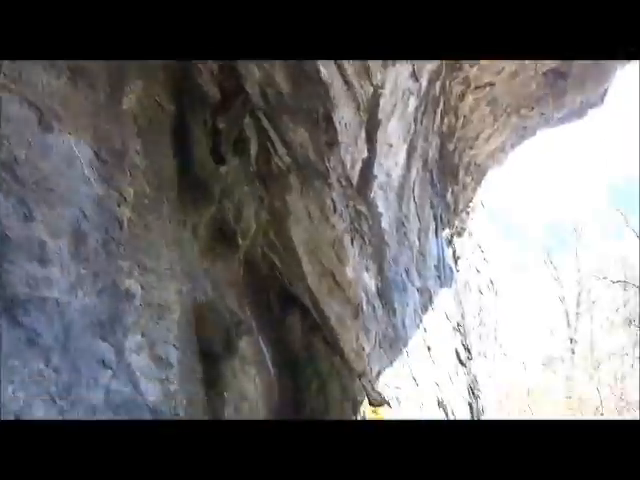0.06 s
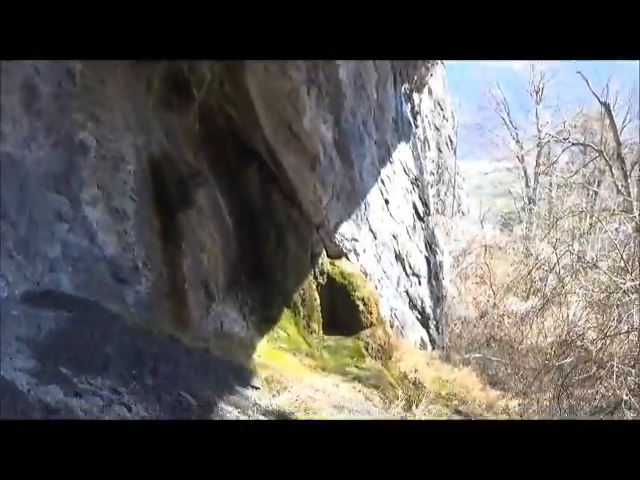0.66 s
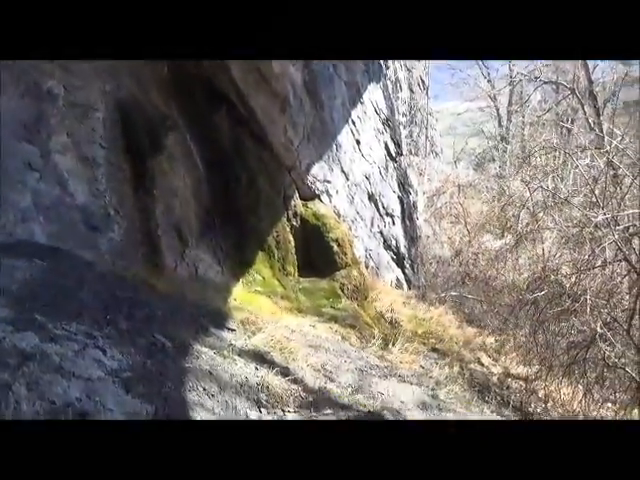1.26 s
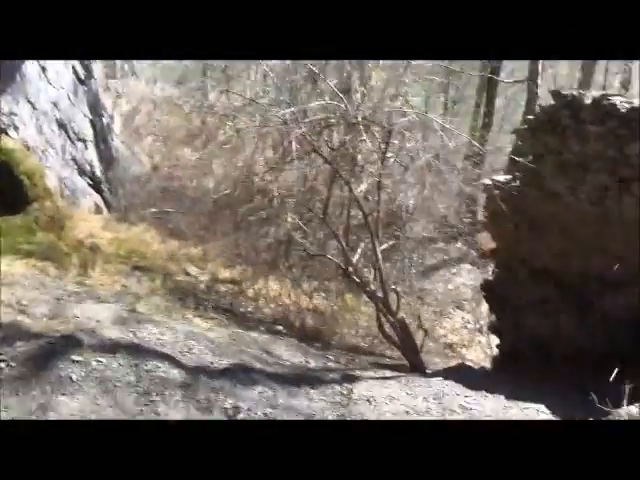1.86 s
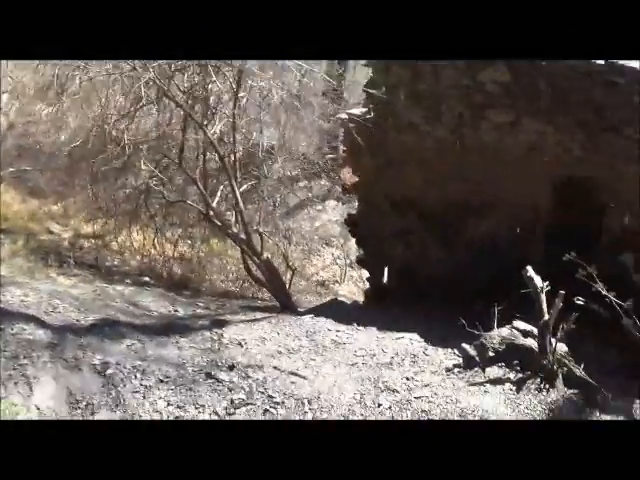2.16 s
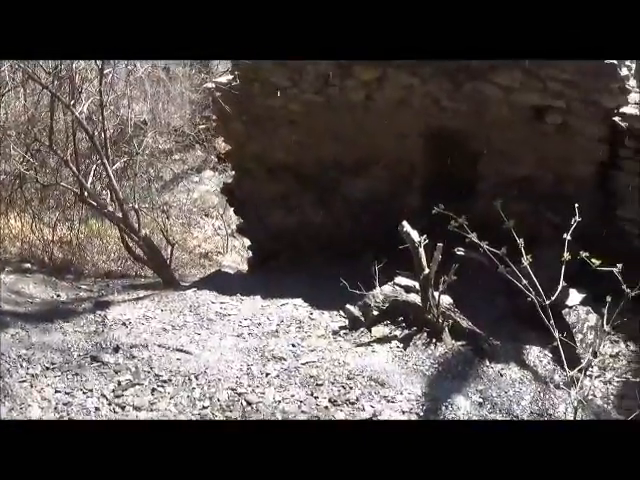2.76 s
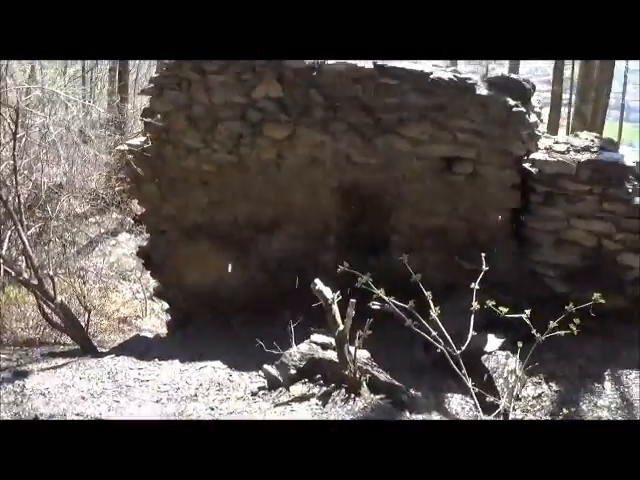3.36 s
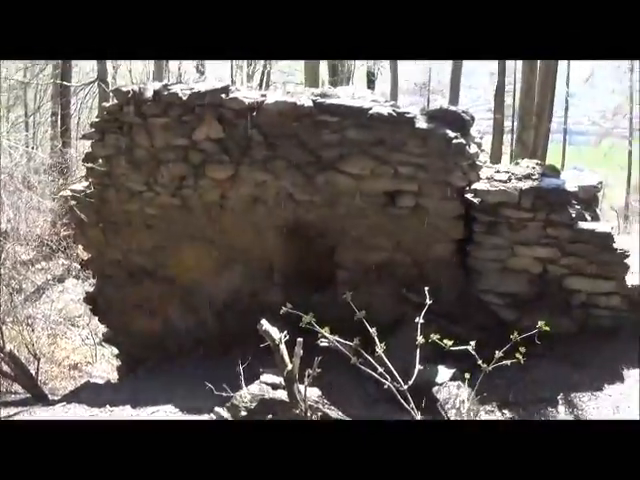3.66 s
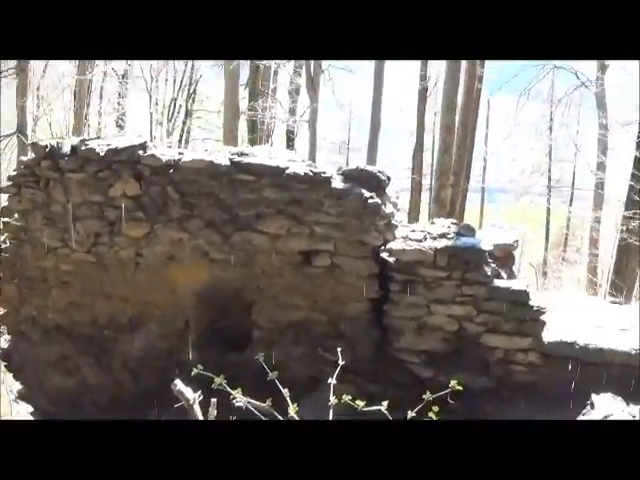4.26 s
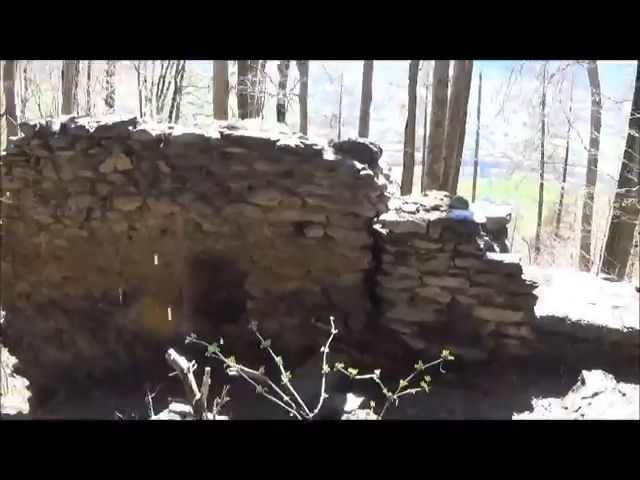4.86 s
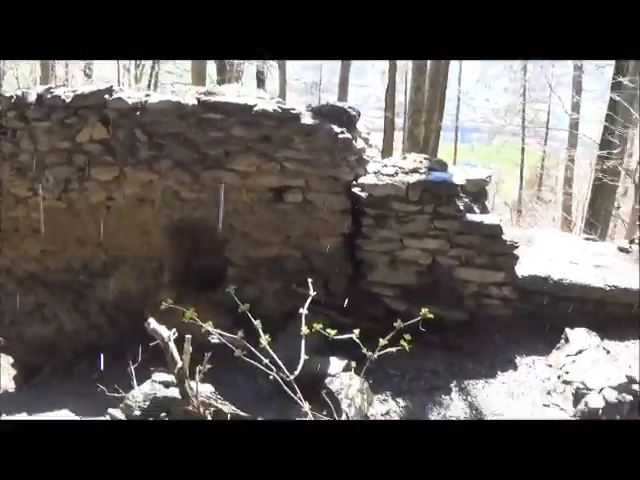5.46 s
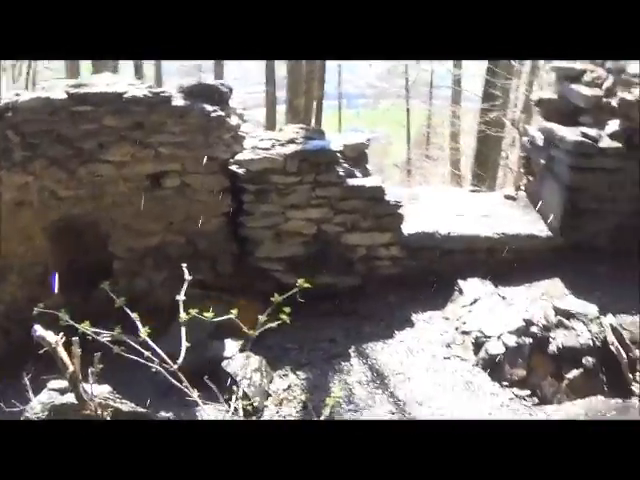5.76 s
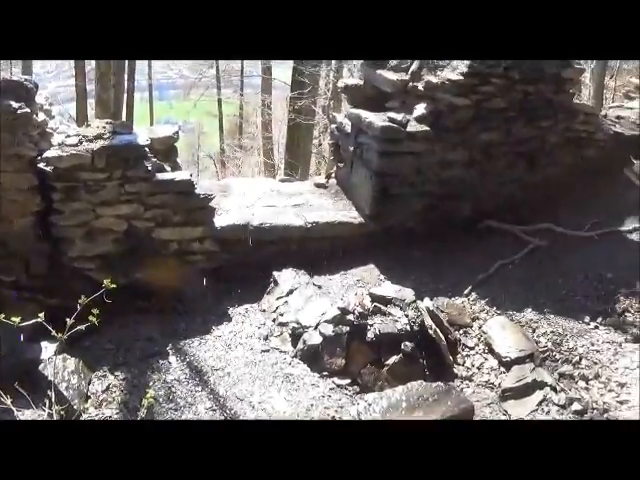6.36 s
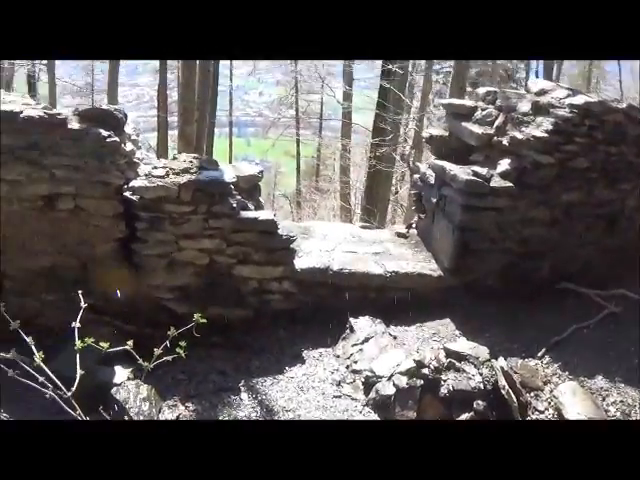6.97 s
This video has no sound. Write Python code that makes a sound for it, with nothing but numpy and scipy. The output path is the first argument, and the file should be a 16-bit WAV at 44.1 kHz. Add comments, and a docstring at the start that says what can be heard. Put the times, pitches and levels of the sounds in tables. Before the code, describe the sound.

Outdoors beneath overhanging rock, many quick drops tick and splash on stones near the microphone, with a light patter behind them and now and then a small ringing bubble in a puddle. The dripping never stops. A few stones knock underfoot in the middle, around one dull, soft step, and a brief gravel scuff comes near the end. Underneath lie a soft distant valley rush and a very faint motor hum.

```python
"""Under a rock overhang above a valley, water drips onto stony ground. Close drops burst in sharp splats,
farther ones blur into a fine patter, and now and then a bubble trapped in a puddle rings.
A shoe thuds softly on the ground and a few stones clack and crunch under it.
The valley rushes far below, over a faint rumble and the hum of a camera's motor."""
import sys
import numpy as np
from scipy import signal
from scipy.fft import rfft, irfft, next_fast_len
from scipy.io import wavfile
from scipy.ndimage import map_coordinates

SR = 44100
rng = np.random.default_rng(int(sys.argv[2]) if len(sys.argv) > 2 else 0)


def to_wav(sig):
    """Store sig (one row per channel, or 1-D mono) as 16-bit WAV at the path in sys.argv[1].

    Samples outside -1..1 are clipped; the rate is SR.
    """
    pcm = np.clip(np.atleast_2d(sig), -1, 1) * 32767
    pcm = np.round(pcm).astype(np.int16)
    wavfile.write(sys.argv[1], SR, pcm.T)  # frames by channels


N = 310023

TOP_HZ = 11150  # the treble ends here
# How alike far sounds are in both ears. Each row: frequency in Hz, likeness from 0 to 1 (the same).
EAR_LIKENESS = [(60, 1), (270, 0.98), (570, 0.89), (1200, 0.76), (3000, 0.56), (9000, 0.82)]
# How hard it drips. Each row: time in seconds, relative levels in dB of the patter and of the fine spray.
DRIP_FLOW = [(0, -44, -37.5), (.45, -45, -37.5), (.85, -45.5, -36.5), (1.25, -45.5, -39.5),
             (1.7, -45, -39.5), (2.1, -44, -38.5), (2.75, -45, -37), (3.1, -45.5, -37.5),
             (3.45, -47, -39.5), (3.65, -45, -36.5), (3.9, -46, -40.5), (4.35, -44.5, -37.5),
             (4.85, -44.5, -36), (5.2, -46, -39), (5.42, -44, -36.5), (6.15, -46, -36.5),
             (6.45, -44, -38.5), (7.03, -45.5, -37)]
# The camera turns, so the drops drift from right to left.
# Each row: time in seconds, left minus right level in dB, boost of the lesser drops in dB.
CAMERA_TURN = [(0, -2.5, -4.5), (1.5, -2, 1.5), (2.3, -1, -1.5), (4, 1.2, 3.5), (5, 1, -3.5),
               (7.03, 3.5, 2)]


def amp(db):
    """Turn decibels into a number to multiply a sound by."""
    return 10 ** (np.asarray(db) / 20)


def unit(x):
    """Scale a sound so that its average level (rms) is 1."""
    return x / np.sqrt(np.mean(x ** 2) + 1e-20)


def along(points, hz):
    """Read between (Hz, value) points, giving every octave equal room."""
    point_hz, values = np.transpose(points)
    return np.interp(np.log(hz + 1), np.log(point_hz), values)


def curves(rows):
    """Turn each column after the time into a curve with one value per sample."""
    times, *columns = np.transpose(rows)
    return [np.interp(np.arange(N) / SR, times, column) for column in columns]


def wobble(rate):
    """A smooth curve through rate random values a second."""
    return map_coordinates(rng.standard_normal(int(N * rate / SR) + 4), [np.arange(N) * rate / SR])


def filtered(x, response):
    """Turn each frequency of x up or down by response(hz)."""
    size = next_fast_len(N + SR // 4)
    return irfft(rfft(x, size) * response(np.fft.rfftfreq(size, 1 / SR)), size)[..., :N]


def noise(spectrum):
    """Far-off stereo noise of level 1, its tone shaped by (Hz, dB) points."""
    def colour(hz):
        width = np.arccos(np.clip(along(EAR_LIKENESS, hz), -1, 1)) / 2
        return amp(along(spectrum, hz)) * [np.cos(width), np.sin(width)]
    mid, side = filtered(rng.standard_normal((2, N)), colour)
    return unit(np.array([mid + side, mid - side]))


def place(times, sounds):
    """Add up short sounds, shaped (events, 2 ears, samples), at their times in seconds."""
    at = np.maximum(np.round(times * SR).astype(int)[:, None] + np.arange(sounds.shape[-1]), 0)
    return np.array([np.bincount(at.ravel(), sounds[:, ear].ravel(), N)[:N] for ear in range(2)])


def rumble():
    """A faint deep rumble comes and goes."""
    # Each row: time in seconds, level in dB.
    levels = [(0, -56), (1.2, -75), (1.6, -79), (5.2, -61), (6.2, -56.5), (6.7, -56), (7.03, -69)]
    level_db, = curves(levels)
    return amp(level_db) * noise([(30, -40), (46, -29), (55, -2), (70, -20), (120, -12), (400, -120)])


def motor():
    """The camera's motor hums at 1 to 4 times its turning rate, which drifts a little."""
    # The first and third tones. Each row: pitch in Hz, average level in dB.
    odd_tones = [(69.8, -80), (209.5, -64)]
    # The even tones swell and fade. Each row: time in seconds, second tone in dB, fourth tone in dB.
    even_levels = [(0, -58, -76), (.9, -57.5, -75), (1.35, -56, -57), (2.05, -67, -56.5), (2.6, -66, -64),
                   (3.2, -55, -58), (4.1, -70, -63), (4.7, -65, -66), (5.8, -66, -68), (7.03, -62, -76)]
    drifting_time = np.cumsum(1 + 0.003 * wobble(3)) / SR
    shaft_hz = odd_tones[0][0]
    second_db, fourth_db = curves(even_levels)
    tones = odd_tones + [(2 * shaft_hz, second_db), (4 * shaft_hz, fourth_db)]
    return sum(np.sqrt(2) * amp(db + wobble(6.6)) * np.sin(2 * np.pi * hz * drifting_time)
               for hz, db in tones)


def valley():
    """Far below, a deep roar and a higher rush each swell at their own pace."""
    # Each row: time in seconds, relative levels in dB of the roar and of the rush.
    levels = [(0, -47.5, -45.5), (.45, -48, -48.5), (1, -48, -47.5), (1.5, -46.5, -47), (2.3, -47.5, -49.5),
              (2.7, -47, -47.5), (3.4, -48, -48.5), (4.1, -48.5, -48), (4.8, -47, -49), (5.55, -47.5, -47),
              (6.05, -49, -49), (7.03, -47.5, -47)]
    # The tone of each. Each row: frequency in Hz, relative level in dB.
    roar_spectrum = [(20, -23), (35, -10), (55, -2.5), (120, 1), (330, -0.5), (480, -3), (800, -4.5),
                     (2000, -66)]
    rush_spectrum = [(200, -24), (480, -9), (780, -1.5), (980, -1.5), (1300, -10), (2000, -20),
                     (5000, -15.5), (11000, -15)]
    roar_db, rush_db = curves(levels)
    roar = amp(roar_db + 1.2 + 0.56 * wobble(14)) * noise(roar_spectrum)
    rush = amp(rush_db + 4.0 + 0.7 * wobble(4)) * noise(rush_spectrum)
    return roar + rush


def valley_swells():
    """Now and then one range of pitches in the valley's rush rises and sinks back."""
    # Each row: peak time and spread in seconds, level in dB, pitch in Hz, width in octaves.
    swells = [(0.12, .15, -50.5, 392, 0.15), (1.7, .3, -58, 260, 0.66), (3.95, 0.36, -50, 245, 0.43),
              (4.9, 0.34, -51, 830, 0.18)]
    t = np.arange(N) / SR
    grid_hz = np.geomspace(40, 4000, num=60)
    total = np.zeros((2, N))
    for peak, spread, db, hz, octaves in swells:
        band_db = -10 * np.log10(np.e) * (np.log2(grid_hz / hz) / octaves) ** 2 / 2
        rise_and_fall = np.exp(-((t - peak) / spread) ** 2 / 2)
        total += amp(db) * rise_and_fall * noise(np.column_stack([grid_hz, band_db]))
    return total


def ticking(rate, decay_ms, spread_db):
    """A loudness curve of random ticks, rate a second: each starts at once and dies away."""
    hits = rng.random(N) < rate / SR
    energy = amp(spread_db * np.clip(rng.standard_normal(N), -2, 2)) ** 2
    kept_per_sample = np.exp(-1000 / (decay_ms * SR))
    return unit(np.sqrt(signal.lfilter([1], [1, -kept_per_sample], hits * energy)))


def far_drops():
    """Farther off, the patter and its fine spray merge into a restless, crackling hiss."""
    # The tone of each. Each row: frequency in Hz, relative level in dB.
    patter_spectrum = [(500, -18), (1300, -2.5), (2200, -1), (3100, 0.5), (5500, -1.5), (8000, -3),
                       (11000, -20.5)]
    spray_spectrum = [(2000, -22), (5000, -38), (7000, -4), (8800, 2), (10000, 2.5), (11200, -12.5)]
    patter_db, spray_db = curves(DRIP_FLOW)
    flurry_db = 0.9 * wobble(70)
    ticks = ticking(rate=520, decay_ms=0.99, spread_db=6.0)
    patter = amp(patter_db - 0.86 + flurry_db) * np.hypot(ticks, 0.9) * noise(patter_spectrum)
    spray = amp(spray_db - 6.5 + flurry_db) * np.hypot(ticks, 0.55) * noise(spray_spectrum)
    return patter + spray


def overhang_echo(x, fade_s):
    """The rock throws back a short, blurred echo that falls by 60 dB in fade_s seconds."""
    t = np.arange(SR // 2) / SR
    tail = rng.standard_normal((2, len(t))) * amp(-60 * t / fade_s) * (1 - np.exp(-t / 0.017))
    return signal.fftconvolve(x, tail / np.linalg.norm(tail[0]), axes=1)[:, :N]


def footstep(rise_s=0.0029):
    """A shoe settles on soft ground with a dull thud, heel then sole."""
    # Each row: start in seconds, level in dB, frequency in Hz above which the thud fades.
    heel_and_sole = [(3.374, -35.5, 330), (3.404, -40, 600)]
    t = np.arange(N) / SR
    thud = np.zeros(N)
    for start, db, hz in heel_and_sole:
        age = np.maximum(t - start, 0) / rise_s
        dull_noise = unit(filtered(rng.standard_normal(N), lambda f: (f > 85) / (1 + (f / hz) ** 4)))
        thud += amp(db) * age * np.exp(1 - age) * dull_noise
    return thud


def impacts(rows, snap, stereo_width, broad_share=0, size=768):
    """A drop or stone hits: a sharp click (as strong as snap) and a noise that dies in milliseconds."""
    # Each row: time in seconds, level in dB (as if the hit lasted 1 ms), pitch in Hz,
    # width in octaves, length in ms, left minus right level in dB.
    start, db, hz, octaves, ms, pan = np.transpose(rows)[:, :, None, None]
    lead, per_ms = size // 12, SR / 1000  # both in samples
    t_ms = (np.arange(size) - lead) / per_ms
    ms = np.maximum(ms, 0.2)
    rise_ms, decay_ms = 0.75 * ms, 3.23 * ms
    envelope = np.exp(-np.abs(t_ms) / np.where(t_ms < 0, rise_ms, decay_ms))
    hiss = rng.standard_normal((len(rows), 3, size))  # shared, left, right
    burst = (hiss[:, :1] + stereo_width * hiss[:, 1:]) * envelope / np.sqrt(ms * per_ms)
    click = (np.arange(size) == lead + size // 128) * snap / ms  # shorter hits click more
    freqs = np.fft.rfftfreq(size, 1 / SR) + 1
    bell = lambda width: np.exp(-(np.log2(freqs / hz) / (2 * width)) ** 2)
    band = (bell(np.maximum(octaves, 0.1)) + broad_share * bell(1.0)) * (freqs < TOP_HZ)
    lag_s = pan * 2.5e-6  # the nearer ear hears it first
    ears = np.array([[1], [-1]])
    wave = irfft(rfft(burst + click) * band * np.exp(1j * np.pi * freqs * lag_s * ears), size)
    wave /= np.sqrt(np.sum(wave.mean(1, keepdims=True) ** 2, 2, keepdims=True) / per_ms)
    return place(start.ravel() - lead / SR, wave * amp(db + ears * pan / 2))


def stones(grains_per_scuff=30):
    """Loose stones clack together under the shoe, and grit crunches in short clouds of grains."""
    # Each row: time in seconds, level in dB, pitch in Hz, width in octaves, length in ms.
    knocks = [(2.476, -24, 1040, 0.64, 0.78), (2.476, -33, 2150, 0.083, 0.54),
              (2.8068, -26.5, 1920, 0.24, 0.63), (2.8069, -31, 5500, .6, .4),
              (4.1645, -37, 1150, 0.35, 4.2), (4.1646, -35, 4600, .6, .9), (4.1743, -27, 7000, 0.71, 1.3),
              (4.1745, -30, 1050, 0.39, 3), (4.3145, -35, 1150, 0.18, 2), (4.3730, -31.5, 950, 0.24, 2.8)]
    # Each row: middle time in seconds, level of a grain in dB, spread in seconds, pitch in Hz.
    scuffs = [(1.004, -40, 0.0067, 3000), (4.171, -39.5, 0.005, 2100), (6.328, -37.5, 0.02, 3800)]
    clacks = impacts(np.column_stack([knocks, np.zeros(len(knocks))]), snap=1.0, stereo_width=0.18)
    middle, db, spread, hz = np.repeat(scuffs, grains_per_scuff, axis=0).T
    when, size, pitch, pan = rng.standard_normal((len(middle), 4)).T
    octaves, ms = np.full(len(middle), 0.6), np.full(len(middle), 1.8)
    grains = [middle + spread * when, db + 0.57 * size, hz * 2 ** (0.5 * pitch), octaves, ms, pan]
    return clacks + impacts(np.column_stack(grains), snap=0.26, stereo_width=1.0)


def drip_times(count):
    """Uneven moments without long gaps: one falls somewhere in each equal slot of time."""
    return (np.arange(count) + rng.random(count)) / count * N / SR


def faint_bubbles(count=36, middle_hz=4200, middle_db=-40, db_per_octave=6.5):
    """Rows for the faint bubbles that drops trap by chance; the small, high ones peak louder."""
    start = drip_times(count)
    octave = rng.uniform(-1.12, 1, count)
    return np.column_stack([start, middle_db + db_per_octave * octave, middle_hz * 2 ** octave])


def bubbles(ring_cycles=28, size=2048):
    """A trapped bubble rings briefly; its pitch wavers and climbs as it nears the surface."""
    # Each row: start in seconds, relative level in dB, starting pitch in Hz.
    clear_bubbles = [(.349, -39.5, 1930), (.3495, -37, 3450), (.367, -43, 3150), (.5265, -42, 1730),
                     (.806, -42, 1590), (.9339, -42, 2180), (.974, -36, 3570), (.9742, -30, 4800),
                     (1.078, -27, 8600), (1.22, -38, 4400), (1.3, -43, 2730), (1.54, -25, 8660),
                     (1.9499, -32.5, 4200), (2.0075, -38, 3200), (2.1859, -36, 2900), (2.3626, -27, 8540),
                     (2.39, -42, 2960), (2.4975, -45, 3000), (2.5035, -30, 8100), (2.5665, -41, 3850),
                     (2.5854, -20.5, 9300), (2.7353, -31, 4140), (2.856, -43, 1530), (2.898, -41, 3500),
                     (2.9825, -34, 6200), (3.192, -45, 6490), (3.282, -29, 9600), (3.405, -35, 5170),
                     (3.412, -38, 3160), (3.5705, -39.5, 2660), (3.7245, -37.5, 2970), (4.082, -36, 3790),
                     (4.099, -29, 8300), (4.1746, -30.5, 4040), (4.2544, -35.5, 2900), (4.612, -44, 2020),
                     (4.7888, -35, 2930), (4.8725, -38, 3280), (4.963, -42, 2000), (5.0424, -38, 2690),
                     (5.056, -37, 3660), (5.272, -40, 3500), (5.3716, -28.5, 6000), (5.5915, -36.5, 3450),
                     (5.7065, -39, 2710), (6.041, -36, 6140), (6.569, -36, 4500), (6.7044, -27, 9400),
                     (6.796, -39, 3350)]
    start, db, hz = np.vstack([clear_bubbles, faint_bubbles()]).T[:, :, None, None]
    cycles = hz * np.arange(size) / SR
    waver = np.cumsum(rng.standard_normal((len(start), 1, size)), axis=2) * np.sqrt(hz / SR)
    ear_offset = 0.48 * rng.standard_normal((len(start), 2, 1))
    phase = 2 * np.pi * cycles * (1 + 0.00028 * cycles) + 0.49 * waver + ear_offset
    envelope = amp(-60 * cycles / ring_cycles) * (1 - np.exp(-cycles))
    return place(start.ravel(), amp(db + 13.5) * envelope * np.sin(phase))


def facing(times):
    """The camera's turn at these times: left minus right dB, and the lesser drops' boost in dB."""
    turn_times, pan_db, boost_db = np.transpose(CAMERA_TURN)
    return np.interp(times, turn_times, pan_db), np.interp(times, turn_times, boost_db)


def small_drops(count=380):
    """Small drops land in flurries; the high ones follow the spray's level, the low ones the patter's."""
    patter_db, spray_db = curves(DRIP_FLOW)
    odds = amp(1.2 * wobble(45))
    at = np.searchsorted(np.cumsum(odds) / odds.sum(), rng.random(count)).clip(0, N - 1)
    size, pitch, length, side = np.clip(rng.standard_normal((4, count)), -2, 2)
    hz = np.minimum(7800 * 2 ** (0.55 * pitch), 10000)
    _, boost_db = facing(at / SR)
    db = np.where(hz > 6000, spray_db[at] - 0.5, patter_db[at] + 7) + boost_db + 1.6 * size
    octaves, ms = np.full(count, 0.26), 0.4 * np.exp(0.3 * length)
    return impacts(np.column_stack([at / SR, db, hz, octaves, ms, 2 * side]), snap=0.32, stereo_width=0.98)


def medium_drops(count=60):
    """Rows for medium drops that fall by chance, louder when the flow swells."""
    start = drip_times(count)
    size, pitch, width, length = np.clip(rng.standard_normal((count, 4)), -2, 2).T
    flow_times, patter_db, spray_db = np.transpose(DRIP_FLOW)
    flow_db = (patter_db + spray_db) / 2
    _, boost_db = facing(start)
    db = -31.5 + boost_db + np.interp(start, flow_times, flow_db - flow_db.mean()) - size
    hz = 8300 * 2 ** (0.21 * pitch)
    octaves, ms = 0.22 * np.exp(0.6 * width), 0.31 * np.exp(0.3 * length)
    return np.column_stack([start, db, hz, octaves, ms])


def near_drops(droplets_each=2, widest_pan_db=7.5):
    """Big and medium drops burst on the stones; the droplets they throw up land a moment later."""
    # Each row: time in seconds, level in dB, pitch in Hz, width in octaves, length in ms.
    big_drops = [(0.0319, -25, 5420, 1, 0.75), (0.1101, -29, 6900, 0.55, 0.6),
                 (0.1317, -28, 7400, 0.36, 0.6), (0.1389, -25.5, 7300, 0.38, 0.4),
                 (0.2163, -24.0, 8120, 0.22, 0.6), (0.2602, -31, 5670, 0.13, 0.6),
                 (0.3493, -31, 5000, 0.59, 0.35), (0.4016, -20.5, 6960, 0.16, 0.54),
                 (0.5316, -28.5, 8800, 0.11, 0.82), (0.5594, -30, 6000, 0.58, 0.8),
                 (0.5919, -32, 5900, 0.24, 0.6), (0.7159, -29, 5200, 0.25, 0.8),
                 (0.7839, -29, 5570, 0.19, 0.9), (0.8134, -31, 8500, 0.21, 0.6),
                 (0.8977, -25.5, 9040, 0.16, 1.2), (0.9154, -23, 7690, 0.21, 0.4),
                 (0.9344, -26, 6550, 0.23, 0.92), (0.974, -27.5, 5600, 0.77, 0.35),
                 (0.9858, -38, 7000, 0.39, 0.6), (0.9943, -29, 8200, 0.2, 0.6),
                 (1.0256, -26.5, 9800, 0.6, 0.63), (1.0291, -37, 6000, 0.29, 0.6),
                 (1.0495, -24, 6600, 0.4, 0.6), (1.0925, -29, 7100, 0.3, 0.89),
                 (1.1337, -29, 5800, 0.37, 0.65), (1.1528, -26, 9800, 0.67, 0.8),
                 (1.171, -31, 6550, 0.6, 1.0), (1.3902, -28, 9600, 0.18, 0.6),
                 (1.4557, -35, 5200, 0.79, 0.6), (1.4763, -22.5, 6800, 0.28, 0.72),
                 (1.543, -28, 9040, 0.11, 0.4), (1.582, -26, 8570, 0.11, 0.5),
                 (1.6358, -27.5, 5880, 0.26, 0.9), (1.6439, -28, 6910, 0.55, 1.0),
                 (1.6495, -26.5, 8570, 0.51, 1), (1.6748, -30, 6200, 0.6, 0.6),
                 (1.7002, -21.5, 7290, 0.37, 0.23), (1.7124, -25, 6200, 0.22, 0.65),
                 (1.737, -28, 7900, 0.22, 0.8), (1.7747, -30, 4500, 0.37, 0.6),
                 (1.801, -26.5, 9800, 0.36, 0.4), (1.8167, -27.5, 4740, 0.11, 0.5),
                 (1.8591, -29, 5200, 0.8, 0.6), (1.9497, -26, 5100, 0.33, 0.37),
                 (1.9539, -23, 7700, 0.32, 0.41), (1.9944, -30, 8800, 0.1, 0.7),
                 (1.9979, -26, 6040, 0.33, 1.3), (2.0066, -28, 8570, 1.0, 0.9),
                 (2.0285, -25.5, 9800, 0.7, 0.8), (2.0769, -36, 6600, 0.55, 0.6),
                 (2.0865, -28, 8800, 0.11, 1), (2.1035, -26.5, 9290, 1.0, 0.66),
                 (2.1354, -31, 6300, 0.59, 0.54), (2.1441, -24.5, 9540, 0.65, 0.81),
                 (2.1529, -28, 8900, 0.31, 0.6), (2.1795, -25, 6200, 0.44, 1.5),
                 (2.2467, -22, 9800, 0.6, 1.1), (2.285, -21, 9900, 0.097, 0.51),
                 (2.3099, -24, 9800, 0.54, 0.4), (2.3178, -30, 6500, 0.68, 0.63),
                 (2.3218, -27, 9000, 0.55, 0.9), (2.3542, -32, 7690, 0.55, 1.4),
                 (2.3907, -28, 4490, 0.39, 0.71), (2.4128, -22, 8700, 0.14, 0.6),
                 (2.4285, -27, 5100, 0.44, 0.54), (2.4437, -19, 8700, 0.22, 0.72),
                 (2.4805, -24, 8800, 0.14, 0.4), (2.4871, -17.5, 7490, 0.11, 0.53),
                 (2.5382, -24, 7600, 0.11, 0.72), (2.5489, -31, 6400, 0.39, 0.6),
                 (2.5668, -27.5, 6200, 0.88, 1.2), (2.6113, -22, 8450, 0.15, 1.1),
                 (2.6398, -24, 7490, 0.62, 1.6), (2.7234, -26, 7900, 0.11, 0.76),
                 (2.7355, -26, 4600, 0.65, 0.55), (2.7473, -28, 8340, 0.26, 1.3),
                 (2.7718, -26, 7290, 0.43, 1.0), (2.7906, -32, 7800, 0.33, 0.55),
                 (2.835, -26.5, 8570, 0.26, 0.8), (2.8605, -26.5, 6370, 0.85, 0.8),
                 (2.8975, -23.5, 6720, 0.76, 1.2), (2.956, -25.5, 7900, 0.3, 0.74),
                 (2.9716, -24.5, 9800, 0.18, 0.37), (2.9828, -29, 6910, 0.18, 0.4),
                 (3.0821, -26.5, 9540, 0.13, 0.44), (3.0912, -24.5, 9040, 1.0, 1.1),
                 (3.1095, -22.5, 8700, 0.14, 0.5), (3.1211, -23, 8000, 0.11, 0.7),
                 (3.193, -26.5, 7700, 0.33, 0.71), (3.2265, -26, 9540, 0.43, 1.3),
                 (3.2453, -28.5, 5200, 0.85, 0.6), (3.2931, -28, 8800, 0.26, 0.3),
                 (3.3602, -28, 8800, 0.11, 1.1), (3.3963, -28, 5420, 0.38, 1.1),
                 (3.4394, -23, 9800, 0.3, 0.71), (3.505, -27, 9290, 0.11, 0.65),
                 (3.5192, -28.5, 9040, 1.0, 0.79), (3.5505, -23.5, 8570, 0.16, 0.21),
                 (3.5588, -27, 8200, 0.19, 0.55), (3.571, -36, 5420, 1.0, 0.9),
                 (3.622, -40, 7300, 0.62, 0.6), (3.6638, -31, 7300, 0.42, 0.6),
                 (3.7244, -32, 3620, 1.0, 0.48), (3.7317, -32, 8700, 0.34, 0.6),
                 (3.757, -25, 7690, 0.24, 0.28), (3.7714, -25.5, 5720, 0.36, 0.5),
                 (3.7852, -24.0, 5270, 0.13, 0.77), (3.8099, -20, 8700, 0.15, 0.62),
                 (3.8388, -24.5, 6550, 0.53, 0.73), (3.8678, -27, 7560, 0.11, 0.69),
                 (3.9081, -26, 9290, 0.1, 1.0), (3.9301, -24.5, 8800, 0.2, 0.9),
                 (3.9974, -21, 9290, 0.65, 1.3), (4.0211, -28.5, 8570, 0.28, 0.76),
                 (4.03, -28, 8750, 0.11, 0.7), (4.0916, -27, 9100, 0.21, 0.6),
                 (4.1168, -30, 6600, 0.46, 0.6), (4.1198, -29, 7800, 0.27, 0.6),
                 (4.1306, -29, 8100, 0.23, 0.6), (4.1565, -22, 7750, 0.15, 0.5),
                 (4.2178, -25.5, 7800, 0.13, 0.92), (4.2337, -31, 5570, 1.0, 1.3),
                 (4.2515, -21.5, 8500, 0.23, 0.7), (4.3243, -27.5, 6370, 0.36, 0.5),
                 (4.355, -30, 8800, 0.1, 0.6), (4.3814, -24, 8120, 0.43, 0.8),
                 (4.3897, -33, 6040, 0.26, 0.2), (4.4023, -28, 6200, 0.78, 1.2),
                 (4.4194, -27, 7690, 0.28, 0.5), (4.4255, -27.0, 9040, 0.3, 1.3),
                 (4.4315, -29, 6910, 0.52, 0.7), (4.4476, -28, 7100, 1.0, 0.75),
                 (4.4912, -25, 5720, 0.36, 1), (4.4946, -26, 6910, 0.25, 0.56),
                 (4.5296, -21.5, 5900, 0.26, 0.69), (4.5815, -26, 9200, 0.13, 1.4),
                 (4.6086, -30, 8200, 0.29, 0.66), (4.6115, -29, 4490, 0.56, 0.63),
                 (4.6823, -25.5, 9000, 0.55, 0.95), (4.7133, -27, 8100, 0.26, 0.6),
                 (4.771, -24.5, 8340, 1.0, 1.7), (4.7848, -27.5, 9290, 0.11, 0.7),
                 (4.7892, -32, 2900, 0.55, 0.6), (4.8726, -26, 6340, 0.37, 0.45),
                 (4.9006, -35, 5800, 0.32, 0.6), (4.9262, -30, 6200, 0.44, 0.71),
                 (4.9294, -25.5, 8800, 0.12, 0.51), (4.9408, -28, 5500, 0.66, 0.65),
                 (4.9862, -29, 8700, 0.13, 0.54), (5.0274, -22, 9000, 0.2, 0.9),
                 (5.0433, -28, 3400, 0.66, 0.66), (5.056, -27.5, 7100, 0.86, 1.4),
                 (5.2428, -26.5, 8000, 0.41, 0.7), (5.2731, -29, 6400, 0.6, 0.49),
                 (5.3228, -26.5, 3170, 0.84, 1.7), (5.328, -24, 9040, 0.22, 1.3),
                 (5.3455, -32, 5400, 0.59, 0.6), (5.3654, -29, 9540, 0.96, 1.4),
                 (5.3771, -23.5, 7240, 0.3, 0.87), (5.3875, -26, 8340, 0.1, 0.6),
                 (5.41, -26, 8160, 0.14, 0.59), (5.4137, -28, 6500, 0.6, 0.6),
                 (5.42, -32.5, 5700, 0.28, 0.6), (5.4807, -27.5, 5720, 0.18, 0.5),
                 (5.5153, -29, 8000, 0.18, 0.6), (5.535, -28, 8120, 0.13, 0.27),
                 (5.5453, -29, 5000, 0.18, 0.9), (5.5805, -34, 5600, 0.38, 0.6),
                 (5.5915, -24, 9000, 0.45, 1.0), (5.6038, -30, 3800, 0.73, 0.67),
                 (5.6311, -27, 7900, 0.15, 0.64), (5.6439, -25, 8570, 0.2, 0.48),
                 (5.7137, -27.5, 8340, 0.13, 0.44), (5.7709, -33, 7100, 0.39, 0.6),
                 (5.7828, -25.5, 8800, 0.22, 1.3), (5.7926, -34, 9800, 0.98, 0.64),
                 (5.8152, -24.5, 8340, 0.16, 0.45), (5.836, -28, 7690, 0.43, 0.57),
                 (5.8615, -29.5, 4400, 0.23, 0.59), (5.9516, -27, 9800, 0.39, 0.9),
                 (5.9634, -24, 8800, 0.28, 1.2), (5.964, -30, 3800, 0.29, 0.62),
                 (5.9882, -26.5, 7800, 0.11, 0.56), (6.0409, -32, 6200, 0.11, 0.5),
                 (6.0662, -29, 7690, 0.35, 0.51), (6.071, -31, 4200, 0.33, 0.65),
                 (6.078, -28, 5140, 0.75, 1.2), (6.0828, -24, 8800, 0.1, 0.7),
                 (6.106, -22.5, 8570, 0.2, 0.5), (6.1301, -31, 8340, 0.18, 0.8),
                 (6.1348, -21.5, 8000, 0.16, 0.6), (6.1513, -23, 9040, 0.093, 0.73),
                 (6.1538, -32.5, 3300, 0.28, 0.78), (6.2322, -29, 9600, 0.1, 0.6),
                 (6.2763, -25, 9200, 0.3, 0.6), (6.294, -27, 9540, 0.34, 0.74),
                 (6.3832, -26, 8570, 0.18, 1.1), (6.4676, -28, 8800, 0.13, 0.8),
                 (6.4812, -24, 8120, 0.18, 1.3), (6.503, -20.5, 8570, 0.3, 0.39),
                 (6.5205, -25.5, 7900, 0.15, 0.97), (6.5534, -29, 9290, 0.1, 1),
                 (6.5791, -26, 9040, 0.1, 0.66), (6.6832, -31, 5300, 0.64, 0.6),
                 (6.7541, -26.0, 7690, 0.18, 0.3), (6.7596, -28, 5570, 0.51, 1.1),
                 (6.7646, -26, 9290, 0.13, 1.0), (6.7961, -28, 9800, 0.59, 0.72),
                 (6.8287, -31, 5300, 0.5, 0.6), (6.8402, -30, 9800, 0.36, 0.74),
                 (6.8444, -29.5, 4300, 0.38, 0.38), (6.8492, -20, 8250, 0.14, 0.97),
                 (6.9393, -30, 6910, 0.22, 0.6)]
    start, db, hz, octaves, ms = np.vstack([big_drops, medium_drops()]).T
    pan_db, _ = facing(start)
    pan_db *= (6800 / hz) ** 3  # duller drops lie farther to the side
    pan_db += 1.5 * rng.standard_normal(len(start))
    drops = np.column_stack([start, db, hz, octaves, ms, np.clip(pan_db, -widest_pan_db, widest_pan_db)])
    droplets = np.repeat(drops, droplets_each, axis=0)
    delay, size, pitch = rng.standard_normal((len(droplets), 3)).T
    droplets[:, 0] += 0.0057 * np.exp(0.87 * delay)  # later
    droplets[:, 1] += -16.5 + size  # quieter
    droplets[:, 2] *= 2 ** (0.18 * pitch)  # a little higher or lower
    splats = impacts(drops, snap=0.53, stereo_width=0.23, broad_share=0.15)
    return splats + impacts(droplets, snap=0.95, stereo_width=0.69)


def scene():
    """Water and stones echo under the overhang; the valley lies a little to the left."""
    close = near_drops() + small_drops() + bubbles() + stones() + footstep()
    background = (valley() + valley_swells()) * amp([[0.45], [-0.45]]) + motor() + rumble()
    return close + amp(-13.5) * overhang_echo(close, fade_s=0.28) + far_drops() + background


def record(dry):
    """The camera cuts off the treble steeply above TOP_HZ."""
    return filtered(dry, lambda hz: 1 / np.sqrt(1 + (hz / TOP_HZ) ** 140))


dry = scene()
out = record(dry)
to_wav(out)
```